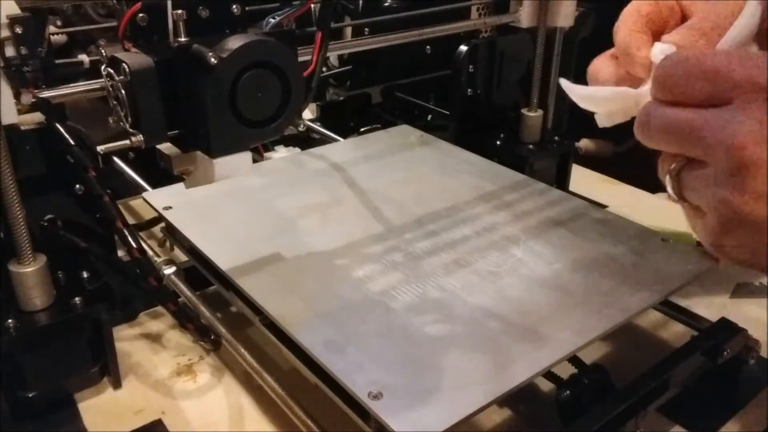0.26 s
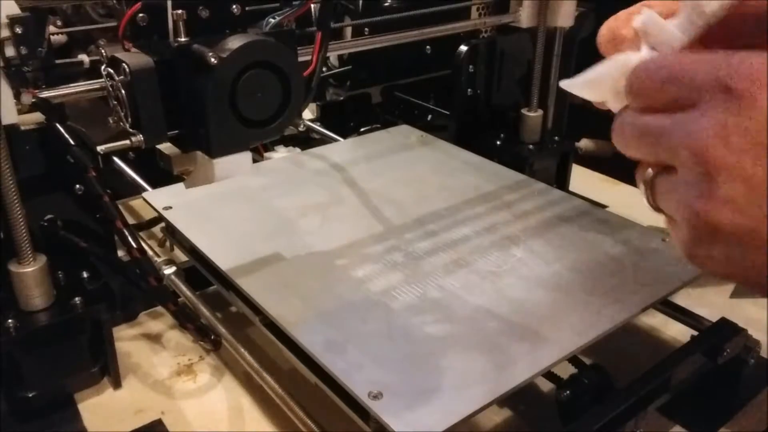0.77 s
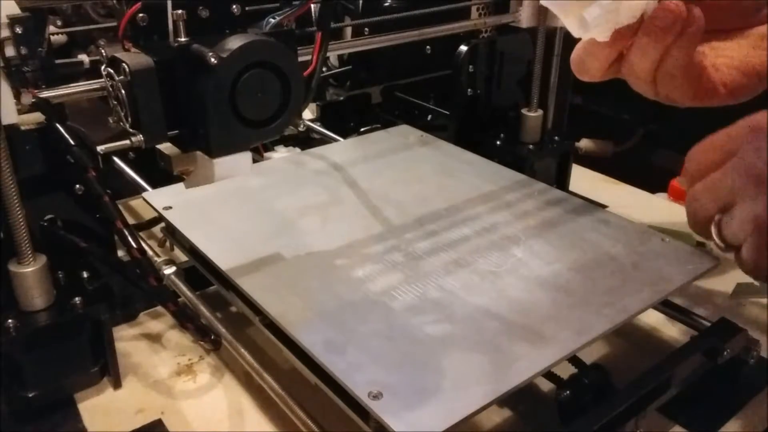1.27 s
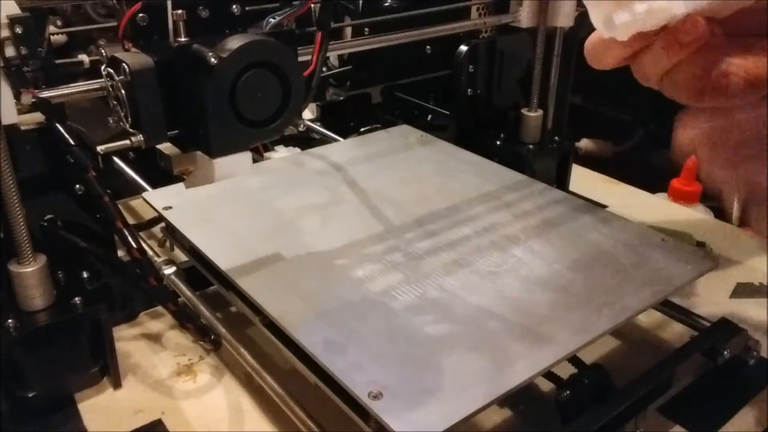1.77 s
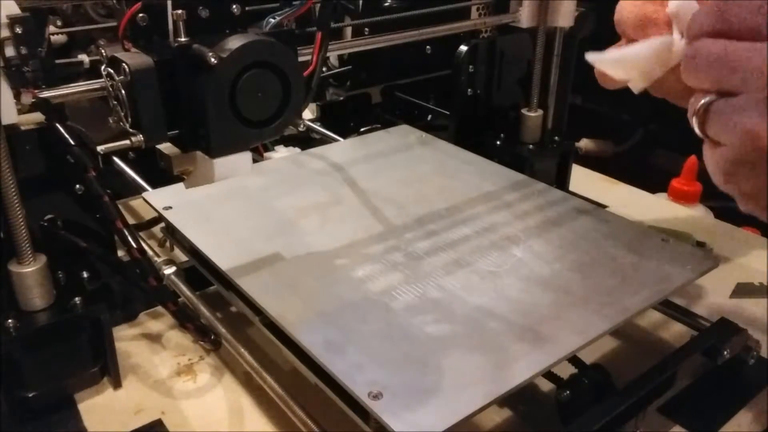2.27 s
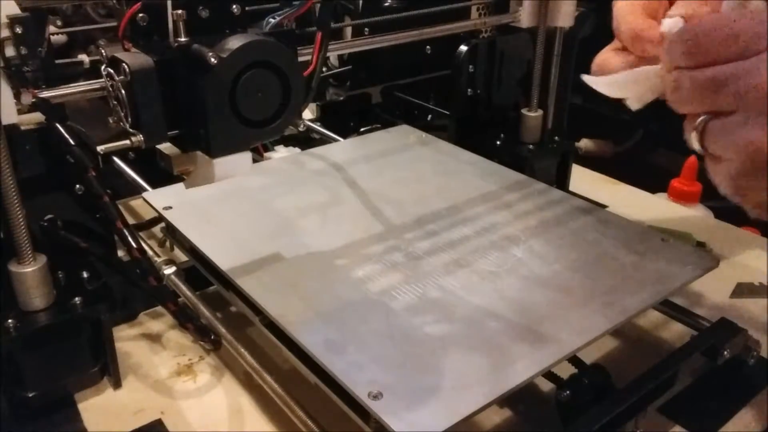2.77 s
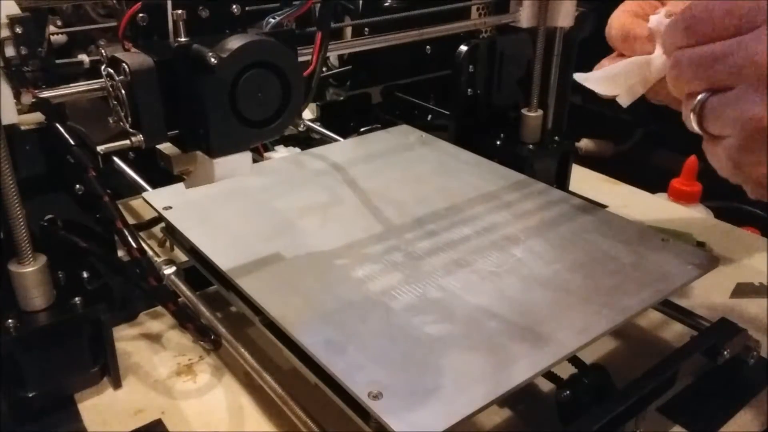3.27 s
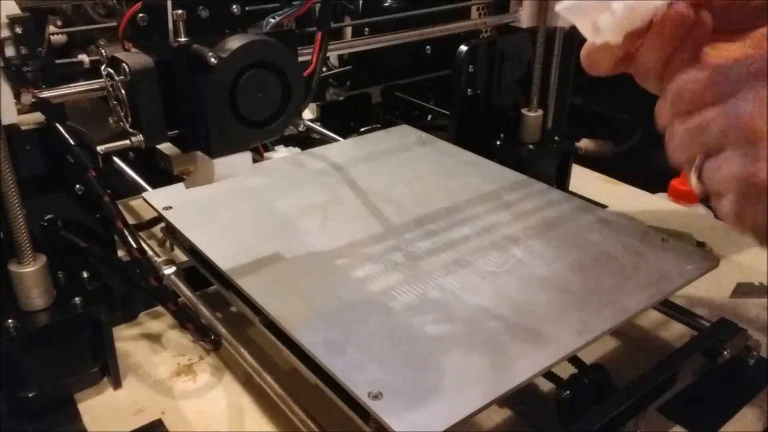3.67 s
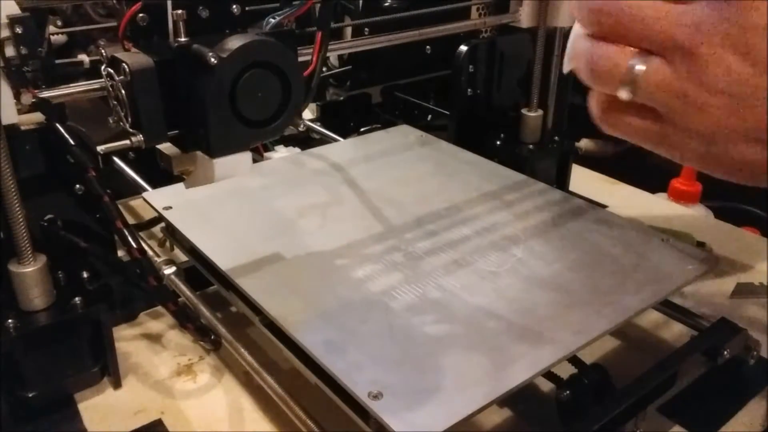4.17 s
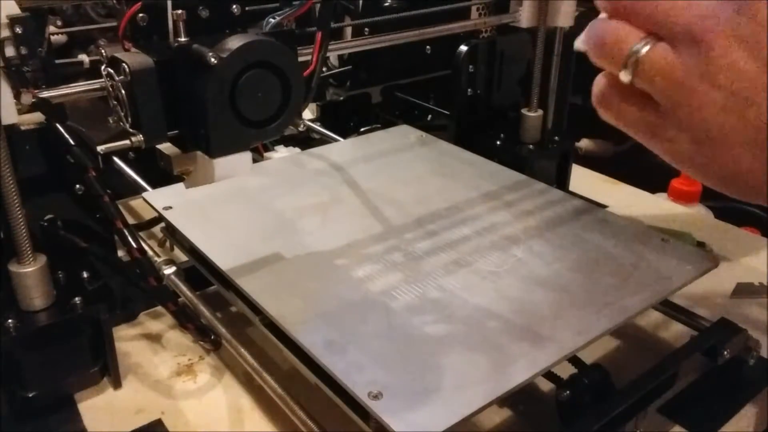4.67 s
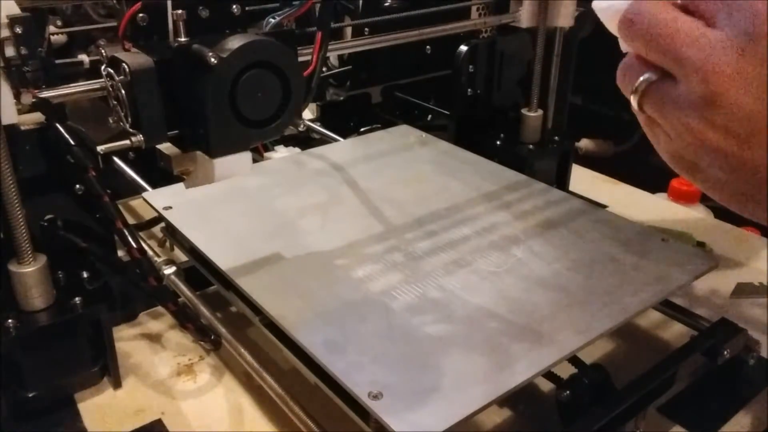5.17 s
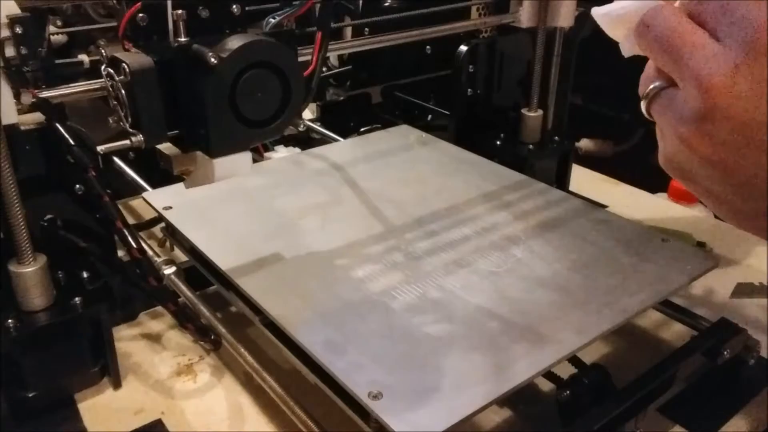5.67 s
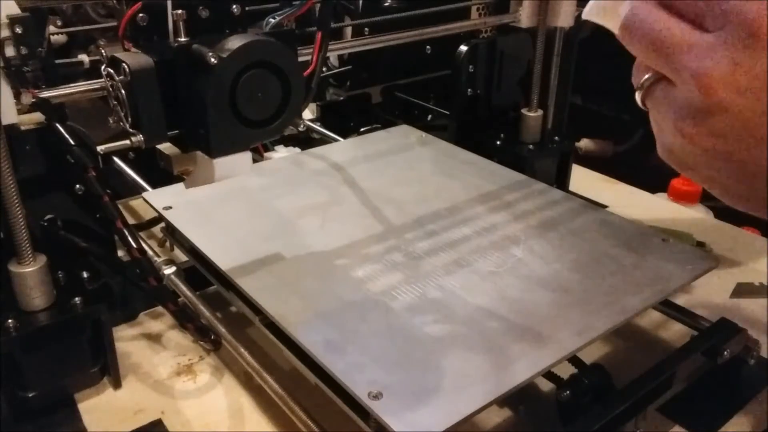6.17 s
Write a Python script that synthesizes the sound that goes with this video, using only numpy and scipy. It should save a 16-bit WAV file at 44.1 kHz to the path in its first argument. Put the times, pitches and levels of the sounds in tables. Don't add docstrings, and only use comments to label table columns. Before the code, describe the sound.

Close indoor handling of hard plastic: light scrap clatters, finger rubbing, then loud crisp cracks and tiny metallic ticks above quiet fan noise.

```python
import sys
import numpy as np
from scipy import signal
from scipy.fft import rfft, irfft
from scipy.io import wavfile

SR = 44100
rng = np.random.default_rng(int(sys.argv[2]) if len(sys.argv) > 2 else 0)


def to_wav(s):
    ch = np.atleast_2d(s).T
    pcm = np.round(np.clip(ch, -1, 1) * 32767)
    wavfile.write(sys.argv[1], SR, pcm.astype(np.int16))


def boost(x):
    u = np.asarray(x, float) / 20
    return 10 ** u


N = 282857
CUTOFF_HZ = 15740


def rms_one(x):
    return x / np.sqrt(np.mean(x ** 2) + 1e-20)


def at_hz(points, hz, column=1):
    points = np.array(points)
    return np.interp(np.log(hz), np.log(points[:, 0]), points[:, column])


def filtered(x, order, edge_hz, kind):
    return signal.sosfilt(signal.butter(order, edge_hz, kind, fs=SR, output="sos"), x)


def drift(rate):
    r = np.exp(-80 * np.pi * rate / SR)
    slow = signal.lfilter([1], [1, -2 * r, r * r], rng.standard_normal(N // 40 + 2002))[2000:]
    return np.interp(np.arange(N) / 40, np.arange(len(slow)), rms_one(slow))


def leak(x, seconds):
    r = np.exp(-1 / (seconds * SR))
    return signal.lfilter([1 - r], [1, -r], x)


def bands(low_hz, per_octave):
    edges = low_hz * 2 ** np.arange(0, np.log2(18000 / low_hz), 1 / per_octave)
    return [(np.sqrt(a * b), signal.butter(2, [a, b], "band", fs=SR, output="sos"))
            for a, b in zip(edges, edges[1:])]


def ring(x, hz, width_hz):
    r, w = np.exp(-np.pi * width_hz / SR), 2 * np.pi * hz / SR
    return signal.lfilter([0, np.sin(w)], [1, -2 * r * np.cos(w), r * r], x + 1e-18)


def body(x, resonances):
    return sum((-1) ** k * boost(db) * ring(x, hz, width) for k, (hz, width, db) in enumerate(resonances))


def struck(x, modes):
    return body(x, [(hz, np.log(1000) / (np.pi * t60), db) for hz, db, t60 in modes])


def rings(rows, rise_ms):
    out, t = np.zeros(N), np.arange(4096) / SR
    for s, db, hz, t60_ms in rows:
        at = round(s * SR)
        rise = 1 - np.exp(-1000 * t / rise_ms)
        out[at:at + 4096] += boost(db - 6e4 * t / t60_ms) * np.sin(2 * np.pi * hz * t) * rise
    return out


def cracks(events, density, uneven_db, low_stretch, rise_ms):
    trains, span = np.zeros((5, N + 1024)), np.arange(1024)
    luck = rng.random((len(events), 3, 1024))
    stretch = np.array([[low_stretch], [1], [1]])
    for (s, db, low_db, high_db, ms, *ring_db), (born, size, sign) in zip(events, luck):
        at = round(s * SR)
        length = max(ms, .05) * SR / 1000 * stretch
        run = (born < density) | (span == 0)
        run = run * boost(-uneven_db * np.log(size + 0.046)) * np.sign(sign - .5)
        rise = 1 - np.exp(-(span + 1) / (rise_ms * SR / 1000 * stretch ** 2))
        run = run * np.exp(-(span / length) ** 1.2) * rise
        run *= boost(db) / np.sqrt(np.sum(run ** 2, axis=1, keepdims=True) / (1 + length / 14))
        trains[:3, at:at + 1024] += run * boost(np.array([low_db, 0, high_db]))[:, None]
        push_db = db + np.array([low_db + sum(ring_db), high_db])
        trains[3:, at + int(length[1, 0] / 2)] += boost(push_db)
    return trains[:, :N]


def landings(rows, contact, *ring_db):
    ms, low_db, per_db, ceiling_db = contact
    full = []
    for s, db, high_db, *own in rows:
        low = min(low_db + per_db * (-22.0 - db), ceiling_db)
        full.append((s, db, low, high_db, ms, *own, *ring_db))
    return full


# frequency in Hz, width in Hz, level in dB.
LOW_BODY = [(630, 100, -17), (1180, 1090, 5), (2310, 1100, 7.5), (2780, 780, 9.5), (3970, 2370, 11)]
MID_BODY = [(4680, 1150, -6.5), (6550, 1560, 5), (8650, 1460, -1.5)]
HIGH_BODY = [(9140, 580, 9.5), (10300, 1100, 10), (11940, 360, 5.5), (14400, 2400, -4)]


def plastic(trains, top_db=0.0):
    low, middle = body(trains[0], LOW_BODY), body(trains[1], MID_BODY)
    high = body(trains[2], HIGH_BODY[:2]) + boost(top_db) * body(trains[2], HIGH_BODY[2:])
    return boost(-5) * (low + middle + high)


# frequency in Hz, level in dB per Hz.
FAN_AIR = [(50, -32), (100, -40), (170, -29), (250, -18), (400, -2), (600, -5.5), (800, -3), (1050, -8.5),
           (1300, -12), (2000, -14), (3400, -21), (5200, -18), (8000, -17.5), (15500, -23)]
# frequency in Hz, width in Hz, level in dB.
DUCTS = [(82.6, 31, -66.5), (111, 10, -99), (184, 18, -74.5), (306, 19, -69), (335, 10, -71),
         (505, 22, -69), (575, 22, -61), (657, 9, -68), (946.5, 41, -65.5), (1360, 16, -74.5),
         (1709, 30, -72.5), (2416, 210, -68), (4470, 360, -70), (7200, 830, -77.5)]
# frequency in Hz, level in dB rms.
MAINS = [(84, -78), (120, -72), (660, -74)]
# frequency in Hz, level in dB rms.
WHINE = [(5394, -82), (5609, -86), (5830, -87), (15493, -88)]


def fans(patchy_db):
    white, air, together = rng.standard_normal((3, N)), 0, drift(0.82)
    for k, (hz, sos) in enumerate(bands(35, 3)):
        flicker = patchy_db * (1 + 250 / hz) * (.15 * together + drift(9.0))
        air = air + boost(at_hz(FAN_AIR, hz) + flicker) * signal.sosfilt(sos, white[k % 2])
    mix = boost(-57.5) * rms_one(air)
    for hz, width, db in DUCTS:
        mix += boost(db - 0.4 + 2.5 * drift(7)) * rms_one(ring(white[2], hz, width))
    t = np.arange(N) / SR
    for hz, db in MAINS:
        mix += boost(db + 2 + 3 * drift(5)) * np.sin(2 * np.pi * hz * t + 1.5 * drift(1.2))
    for hz, db in WHINE:
        mix += boost(db + 3) * np.sin(2 * np.pi * hz * t)
    return signal.sosfilt(signal.ellip(8, 1, 60, CUTOFF_HZ, fs=SR, output="sos"), mix)


# start in seconds, peak in dB, low share in dB, high share in dB.
SNAPS = [(0.452, -59, -1, 3), (0.608, -64, -8, 6.5), (2.8454, -50, -25, -4), (2.8787, -49, -5, -10),
         (2.8956, -38, -14, 0.5), (2.9803, -46, -13, -9), (3.228, -55, -4, -10), (3.314, -37, -15.5, -7),
         (3.329, -47, -28, -9), (3.342, -43, -17, -12), (3.3517, -52, -19, -17), (4.9294, -66, -9, -16)]
# start in seconds, peak in dB, low share in dB,
# high share in dB, tear length in ms.
BREAKS = [(5.0480, -45, -10, -6, 2.5), (5.0511, -24, -19, -2, 0.15), (5.0559, -32, -15, -4, 0.3),
          (5.2755, -25, -16, 0, 3.4), (5.2815, -22.5, -14, -2.5, 3.5), (5.2845, -22, -11, -6, 4.8),
          (5.293, -27, -12, -6, 5), (5.303, -34, -11, -16, 15), (5.4420, -29, -27, 0, 0.1),
          (5.4446, -33, -35, 2, 0.3), (5.2705, -50, -16, -4, 4)]
# start in seconds, peak in
# dB, pitch in Hz, t60 in ms.
SHORT_RINGS = [(2.845, -48, 5970, 14), (2.956, -45, 3260, 18), (2.957, -48, 4000, 14), (2.9794, -39.5, 3280, 14),
               (2.981, -44, 3930, 20), (2.9796, -36, 6660, 9), (3.1126, -46.5, 5930, 14),
               (2.8952, -39, 6000, 12), (2.8956, -35, 6940, 12), (2.898, -50, 3200, 16), (2.884, -53, 3150, 22),
               (3.152, -52, 5820, 25), (3.174, -50, 5900, 12), (3.231, -51, 2500, 12), (3.3141, -34, 6080, 9),
               (3.3143, -28, 8050, 9.5), (3.3143, -34, 9750, 7.6), (3.3172, -37, 6300, 13),
               (3.330, -42, 8100, 12), (3.342, -44, 5900, 8), (3.342, -44, 8000, 7), (3.342, -42, 9800, 7),
               (5.0510, -7, 7750, 3.3), (5.0510, -12, 6000, 3.5), (5.0510, -7, 12150, 5), (5.0511, -30, 1600, 5),
               (5.052, -32, 4200, 8), (5.0558, -18, 7500, 2), (5.081, -38, 7450, 11), (5.2757, -26, 7700, 9),
               (5.2757, -24, 10100, 8), (5.2757, -22, 12000, 12), (5.276, -29, 5140, 13),
               (5.2817, -22, 12200, 16), (5.2822, -16, 9700, 14), (5.2835, -23, 7600, 14),
               (5.283, -29, 6500, 14), (5.284, -34, 2800, 14), (5.2945, -25, 7900, 12), (5.311, -35, 7700, 10),
               (5.3272, -34, 7800, 25), (5.347, -33, 7800, 12), (5.354, -36, 7840, 15), (5.4420, -10, 7500, 2),
               (5.4420, -7, 11300, 2.2), (5.4423, -38, 3000, 6), (5.4447, -11, 12000, 12),
               (5.4447, -19, 7600, 4), (5.4503, -21, 12300, 10),
               (0.452, -50, 11500, 3), (0.452, -48, 14000, 3), (0.618, -50, 12000, 3), (0.618, -48, 14500, 3),
         (5.0510, -8, 7000, 2.8), (5.0510, -19, 9400, 5), (5.0510, -25, 5000, 3), (5.0558, -24, 9800, 2),
         (5.4420, -6, 9400, 1.8), (5.4447, -12, 9600, 2), (5.4482, -26, 7600, 3), (5.455, -36, 12050, 120),
         (5.4498, -24, 9500, 4), (5.4555, -28, 9300, 3), (5.5868, -30, 5200, 4), (5.5868, -30, 6800, 3),
         (5.5868, -32, 11900, 10), (5.6413, -22, 9800, 2), (5.6548, -35, 7300, 4), (5.6942, -35, 5600, 3),
         (5.6942, -26, 9800, 2)]


def snapping_supports():
    tear_ms = 1.7
    soft = cracks([(*row, tear_ms) for row in SNAPS],
                  density=0.27, uneven_db=-10.0, low_stretch=4.0, rise_ms=0.33)
    hard = cracks(BREAKS, density=0.27, uneven_db=2.5, low_stretch=1.88, rise_ms=0.054)
    struts = filtered(rings(SHORT_RINGS, rise_ms=.06), 2, 2200, "high")
    return plastic(soft, top_db=-8) + plastic(hard) + struts


# start in seconds, hold in seconds, level in dB.
RUBS = [(0.595, 0.091, -66.5), (1.785, 0.2, -57.5), (1.95, 0.14, -62), (2.1, 0.16, -70.5),
        (2.828, 0.015, -64), (2.885, 0.0086, -57), (2.93, 0.12, -61.5), (3.114, 0.07, -63),
        (3.35, 0.05, -61), (4.088, 0.45, -59.5), (4.54, 0.11, -63), (4.7, 1.0, -68), (6.12, 0.34, -74)]
# frequency in Hz, width in Hz, level in dB.
SQUEAK = [(3560, 780, -25), (6500, 1200, -1)]


def rubbing_fingers(per_s):
    t = np.arange(N) / SR
    attack_db_per_s, release_db_per_s, grip_db = 400, 250, -81
    level_db = np.full(N, float(grip_db))
    for s, hold, db in RUBS:
        attack = attack_db_per_s * np.maximum(s - t, 0)
        release = release_db_per_s * np.maximum(t - s - hold, 0)
        level_db = np.maximum(level_db, db - attack - release)
    born = rng.random(N) < per_s * boost(5 * drift(25)) / SR
    size = boost(1.3 * np.minimum(rng.exponential(1, N), 4))
    slips = born * size * rng.choice([-1, 1], N)
    shares = slips * boost(np.array([[-7.0], [0], [-5.0]]))
    return boost(level_db) * rms_one(plastic(shares, top_db=-4) + body(slips, SQUEAK))


# start in seconds, peak in dB, high share in dB, ring in dB.
BOUNCES = [(1.7012, -23.5, -8, -1.5), (1.7071, -23, -12, -14), (1.7294, -46, -14, -12),
           (1.7842, -35.5, -14, -4), (1.8458, -33.5, -11.5, 0.5), (1.8963, -34.5, -20, -7),
           (1.9294, -57, -24, 4), (1.9527, -51, -13, -6), (1.9694, -51, -19, -6), (1.999, -56, -18, -2),
           (2.014, -53, -28, -3), (2.0347, -51, -27, 0), (2.0517, -54, -15, 0)]
# contact in ms, low share in dB at a -22 dB blow, gain in dB per dB softer, ceiling in dB.
BOUNCE_CONTACT = (4, -18, 0.8, -5)
# frequency in Hz, level in dB, t60 in seconds.
SCRAP = [(1715, -3.5, 0.12), (2170, -1, 0.025), (2800, -23, 0.036), (3083, 1, 0.06), (4200, -6, 0.077),
         (4860, -2, 0.047)]
SCRAP_EDGE = [(11420, 8.5, 0.034), (11600, -6, 0.05)]
# start in seconds, peak in dB, pitch in Hz, t60
# in ms.
FACES = [(1.7016, -24, 6700, 20), (1.7016, -25, 11600, 18), (1.7065, -23, 6500, 19),
         (1.708, -23.5, 7630, 15), (1.706, -33, 4800, 43), (1.707, -34, 3040, 30), (1.7135, -29, 6700, 20),
         (1.7845, -47, 6300, 14), (1.786, -43, 3080, 28), (1.847, -49, 3040, 17), (1.847, -38, 6500, 13),
         (1.8965, -40, 3075, 40), (1.954, -46, 3080, 40), (1.967, -49, 3090, 40), (1.998, -46, 3090, 45),
         (2.013, -50, 3090, 40), (2.051, -49, 3090, 45), (3.9452, -27, 3090, 42), (3.947, -25, 4160, 34),
         (3.9455, -26, 5600, 20), (3.9458, -26.5, 6240, 17), (3.946, -24.5, 6920, 22),
         (3.9455, -31, 4860, 22), (3.9455, -30, 2080, 24), (3.9452, -33, 757, 25), (3.946, -35, 1700, 90),
         (3.946, -27, 7900, 12), (3.9455, -18, 12050, 12), (4.1448, -24.5, 6550, 18),
         (4.1455, -25, 4840, 22), (4.1448, -31, 7680, 14), (4.149, -29.5, 4110, 24), (4.148, -32, 3030, 26),
         (4.146, -33.5, 2080, 26), (4.147, -35.5, 1694, 83), (4.147, -40, 1220, 44),
         (4.2785, -33, 3120, 19), (4.302, -39, 3150, 22), (4.302, -39, 4730, 12), (4.3865, -34, 3200, 24),
         (4.388, -44, 1270, 40), (4.385, -34, 6940, 10), (4.454, -39, 3100, 21), (4.482, -50, 3070, 18),
         (4.531, -36, 3050, 24), (4.590, -52, 2980, 21), (4.612, -53, 3000, 16), (1.885, -46, 570, 130),
         (1.951, -48, 580, 50), (1.97, -49, 570, 90),
         (1.785, -44, 1710, 50), (1.785, -44, 2100, 20), (1.822, -54, 2450, 110), (1.848, -43, 1710, 60),
           (1.894, -46, 1710, 30), (1.899, -46, 2100, 25), (1.897, -42, 4900, 18), (1.929, -48, 3060, 35),
           (1.997, -51, 1710, 120), (2.036, -52, 3090, 18), (2.051, -50, 2480, 20), (2.03, -53, 1710, 90),
           (2.068, -52, 1710, 80), (2.0745, -55, 3100, 25), (4.1448, -27, 7900, 14),
           (4.1455, -22, 9800, 10), (4.1450, -31, 11700, 8), (4.147, -40, 800, 30), (4.452, -47, 4800, 12),
           (4.452, -47, 6300, 10), (4.453, -45, 2100, 18), (4.481, -47, 2000, 16), (4.4815, -40, 3020, 20),
           (4.480, -48, 6000, 10), (4.521, -48, 2900, 14), (4.532, -35, 3010, 20), (4.531, -38, 4700, 14),
           (4.531, -39, 5700, 12), (4.531, -38, 2050, 16), (4.532, -41, 1300, 25), (4.559, -49, 4600, 30),
           (4.576, -50, 5500, 12), (4.304, -43, 3300, 22), (4.3865, -42, 5000, 14), (3.946, -36, 2060, 40),
           (3.9465, -27, 6350, 25), (3.9465, -28, 7400, 18), (3.960, -35, 12000, 60),
           (4.155, -40, 12000, 70), (4.39, -42, 12000, 70), (1.707, -38, 2150, 35), (1.707, -39, 2750, 35),
           (4.557, -47, 2400, 25), (4.581, -48, 3900, 15), (4.591, -45, 2950, 20), (4.591, -48, 2000, 16),
           (4.612, -47, 3030, 16), (4.613, -49, 2300, 14), (4.638, -50, 3030, 14)]


def rattling_scrap():
    blows = cracks(landings(BOUNCES, BOUNCE_CONTACT),
                   density=.4, uneven_db=2.5, low_stretch=1.5, rise_ms=.8)
    scrap = plastic(blows, top_db=2.0) + struck(blows[3], SCRAP) + struck(blows[4], SCRAP_EDGE)
    scrap = filtered(scrap, 2, 1500, "high")
    return scrap + rings(FACES, rise_ms=.25)


# start in seconds, peak in dB, high share in dB.
DROPS = [
    (3.9447, -18.5, -9.5),
    (4.1445, -24.5, -15),
    (4.2776, -36, -14),
    (4.3008, -39, -14),
    (4.3852, -37, -3),
    (4.4515, -49, -20),
    (4.4795, -50, -21),
    (4.5296, -37, -24),
    (4.5908, -55, -20),
    (4.612, -56, -23),
]
# contact in ms, low share in dB at a -22 dB blow, gain in dB per dB softer, ceiling in dB.
DROP_CONTACT = (3.5, -9.5, 0.64, 5)
# frequency in Hz, level in dB, t60 in seconds.
BENCH = [(773, -11.5, 0.068), (1240, -8.5, 0.059), (1707, -6.5, 0.11), (2060, -5.5, 0.067),
         (2500, -4, 0.027), (3146, -2.5, 0.035), (3660, -13, 0.025), (5050, -11, 0.03)]
# frequency in Hz, width in Hz, level in dB.
BENCH_DAMPED = [(660, 400, -6), (3250, 1100, -33)]
# frequency in Hz, level in dB, t60 in seconds.
METAL = [(12035, 0, .12), (12180, -6, .06)]


def bench_drops():
    ring_db = -3.5
    blows = cracks(landings(DROPS, DROP_CONTACT, ring_db),
                   density=.4, uneven_db=2.5, low_stretch=1.5, rise_ms=.8)
    bench = plastic(blows, top_db=4.5) + struck(blows[3], BENCH)
    bench += boost(-7.5) * body(blows[0], BENCH_DAMPED)
    bench += struck(blows[4] * boost(-15), METAL)
    return filtered(bench, 2, 520, "high")


# start in seconds, peak in dB, high share in dB, metal ring in dB.
TICKS = [(5.5867, -27, -11, -19), (5.6412, -23, -5.5, -6), (5.6941, -31.5, -1, -12), (5.7444, -49, -8, -23),
         (5.757, -42, -1, -17), (5.8152, -44, -3, -22), (5.8274, -50, -1, -18), (5.8334, -54, -11, -25),
         (5.8684, -53, 1, -20), (5.8855, -54, 4, -23), (5.9164, -60.5, 3, -4), (5.9294, -62, -12, -13),
         (6.0704, -52, -3, -21)]
# contact in ms, low share in dB at a -22 dB blow, gain in dB per dB softer, ceiling in dB.
TICK_CONTACT = (0.6, -30.5, 0.66, -10)


def frame_ticks():
    blows = cracks(landings(TICKS, TICK_CONTACT),
                   density=0.12, uneven_db=-1.0, low_stretch=2.0, rise_ms=0.035)
    return plastic(blows) + struck(blows[3] * boost(22.5), METAL)


# delay in ms, level in dB.
ECHOES = [(2.7, -24), (4.8, -22), (6.6, -24), (11.5, -26)]
# frequency in Hz, t60 in seconds, tail energy in dB.
ROOM = [(990, 1, -9), (2620, 0.69, -7.5), (4850, 0.44, -8.5), (7540, 0.37, -8), (12000, 0.26, -8.5),
        (15200, 0.33, -23)]


def room(x, build_s):
    early_t60_s, early_db = 0.073, -2
    white, out = rng.standard_normal((2, N)), np.zeros(N)
    clumps = [boost(2 * drift(57)) for _ in range(5)]
    for k, (hz, sos) in enumerate(bands(600, 4)):
        direct, diffuse = signal.sosfilt(sos, [x + 1e-18, white[k % 2]])
        power = leak(direct ** 2, build_s)
        stored = leak(power, at_hz(ROOM, hz) / np.log(1e6))
        stored += boost(2 * early_db) * leak(power, early_t60_s / np.log(1e6))
        ragged = clumps[k // 2 % 5] ** min(hz / 7000, 1)
        out += boost(at_hz(ROOM, hz, column=2)) * np.sqrt(stored) * rms_one(diffuse) * ragged
    for ms, db in ECHOES:
        lag = round(ms * SR / 1000)
        out[lag:] += boost(db) * x[:-lag]
    return out


def scene():
    air = fans(patchy_db=2.5)
    snaps = snapping_supports()
    rubs = rubbing_fingers(per_s=880)
    scrap = rattling_scrap()
    bench = bench_drops()
    frame = frame_ticks()
    sent = snaps + boost(-2.0) * bench + boost(-2.5) * scrap + boost(2.5) * frame
    wet = room(sent, build_s=0.00077)
    return (snaps + bench + scrap + frame + wet + rubs + air)[None]


# centre in seconds, depth from 0 to 1.
STARVED = [
    (2.03, .4),
    (3.159, 1.),
    (3.415, .75),
    (4.72, .7),
    (5.483, .6),
    (5.912, .95),
]
KEPT_HZ = [2750, 4600, 5400, 5950, 7500, 9500, 12000]


def thin_out(x, half_s):
    t, hz = np.arange(N) / SR, np.arange(N // 2 + 1) * SR / N
    dip = sum(depth * np.cos(np.pi / 2 * np.clip((t - s) / half_s, -1, 1)) ** 2 for s, depth in STARVED)
    above_bass = 1 / (1 + (1100 / (hz + 1)) ** 4)
    kept_bands = sum(1 / (1 + ((hz - kept) / 170) ** 4) for kept in KEPT_HZ)
    lost = above_bass - 1.4 * kept_bands
    return x - np.clip(dip, 0, 1) * irfft(rfft(x) * lost, N)


# frequency in Hz, level in dB.
MIC = [(5500, -0.5), (6700, 0.5), (7600, 2.5), (8100, -3), (8600, -12), (10200, -3.5), (12200, -6),
       (12900, -18), (14800, -10), (15700, -14)]


def microphone(x):
    hz = np.linspace(0, SR / 2, 513)
    squared = signal.firwin2(255, hz, boost(2 * at_hz(MIC, hz + 1)), fs=SR)
    coloured = signal.lfilter(signal.minimum_phase(squared), [1], x)
    hiss = filtered(rng.standard_normal(N), 4, [15000, CUTOFF_HZ - 100], "band")
    return coloured + boost(-87) * hiss


def low_pass(x):
    return signal.sosfilt(signal.butter(12, 16450, fs=SR, output="sos"), x)


def record(dry):
    cut = filtered(microphone(dry), 3, 119, "high")
    cut = signal.sosfilt(signal.ellip(10, 1, 80, CUTOFF_HZ + 600, fs=SR, output="sos"), cut)
    mix = thin_out(cut, half_s=0.014)
    return low_pass(mix)


dry = scene()
out = record(dry)
to_wav(out)
```